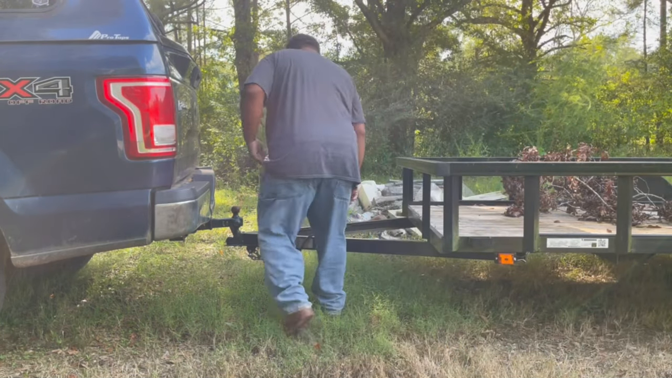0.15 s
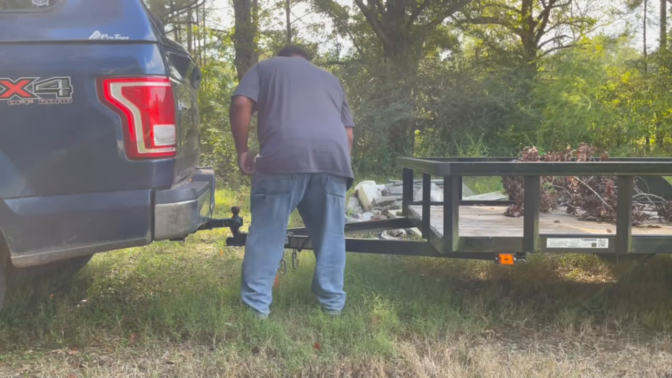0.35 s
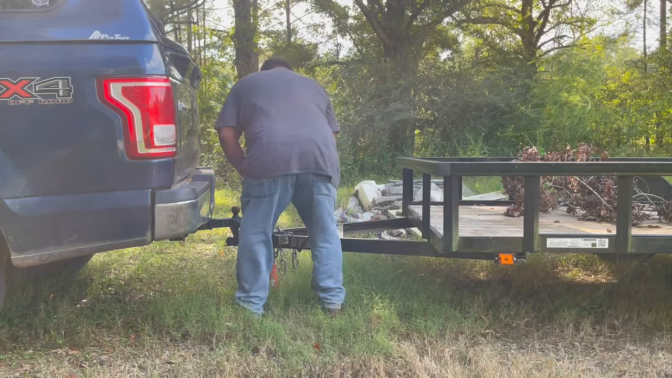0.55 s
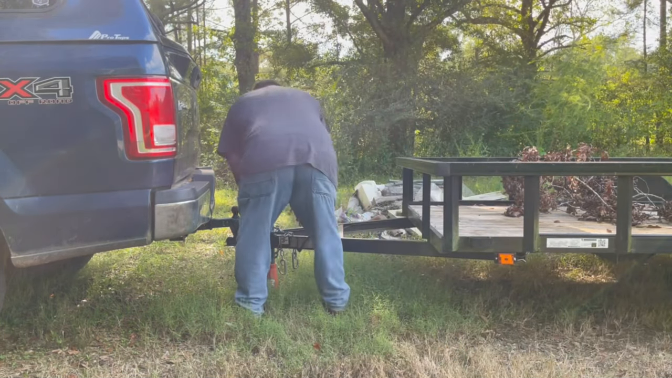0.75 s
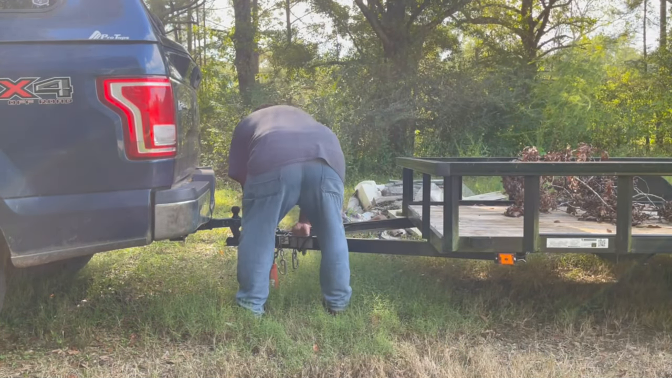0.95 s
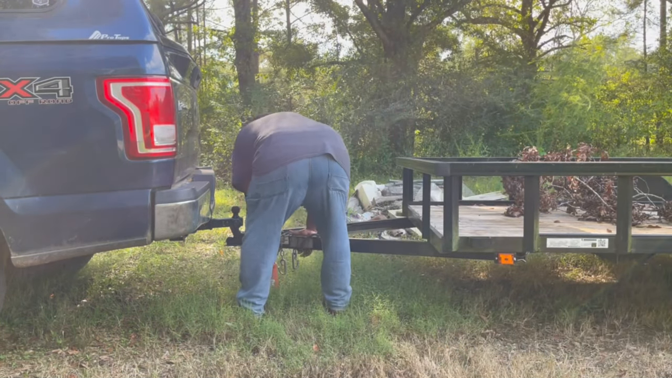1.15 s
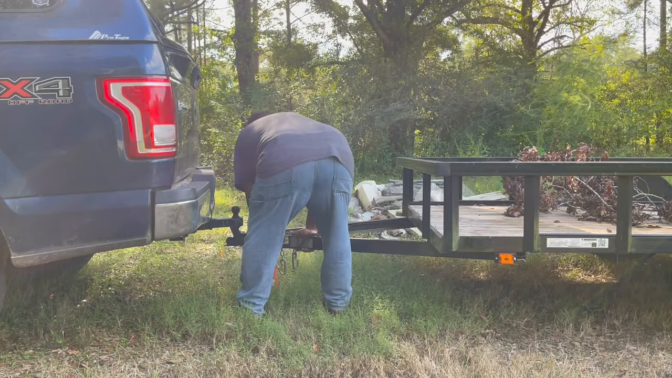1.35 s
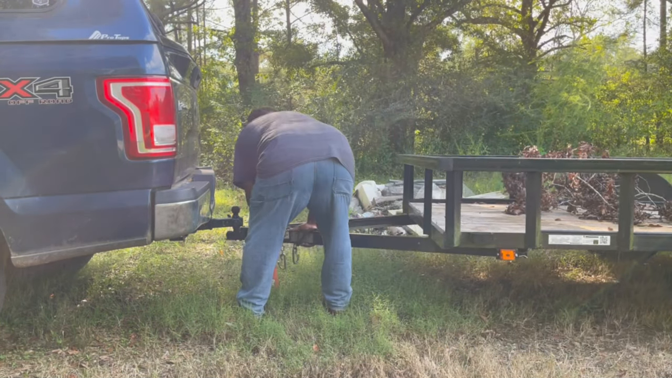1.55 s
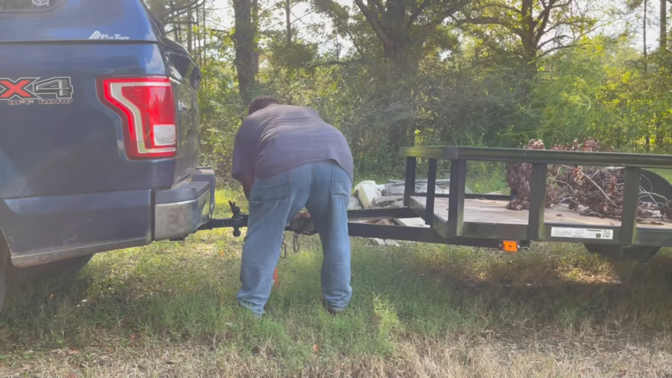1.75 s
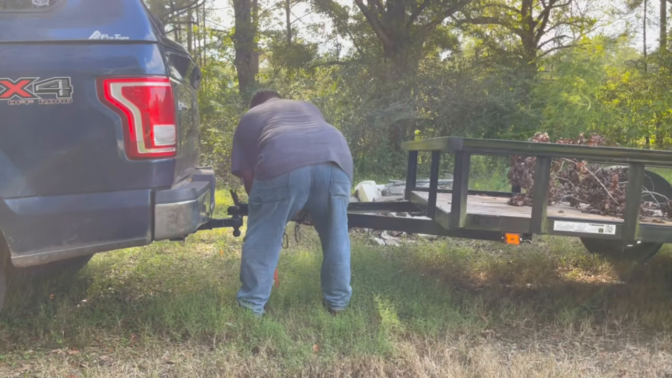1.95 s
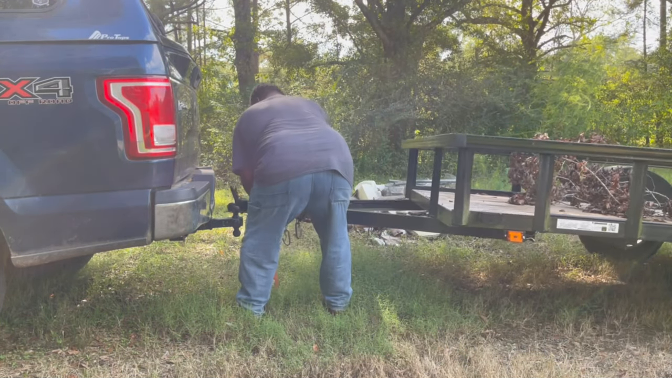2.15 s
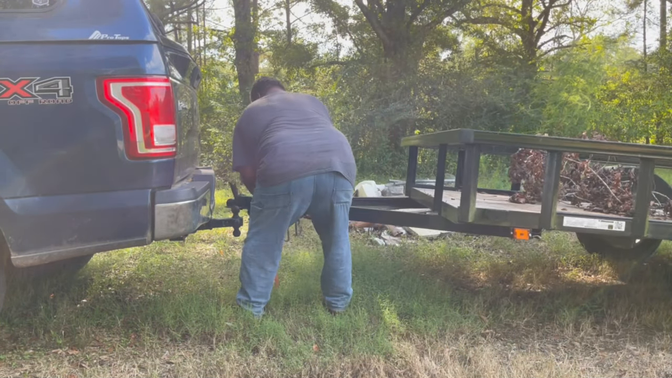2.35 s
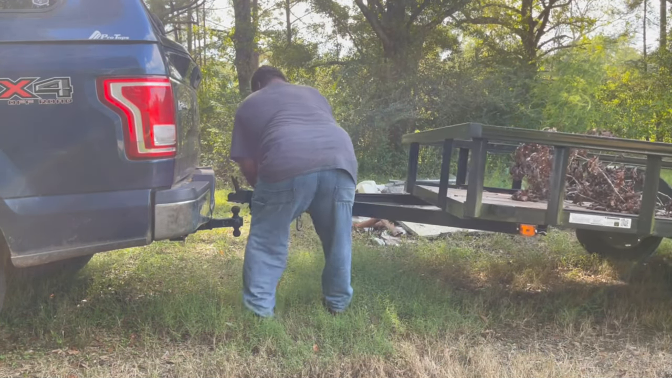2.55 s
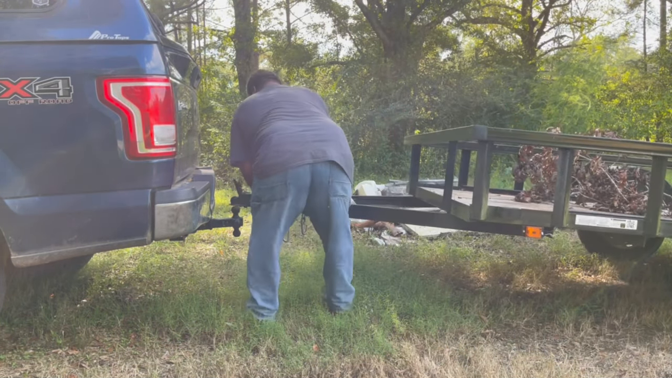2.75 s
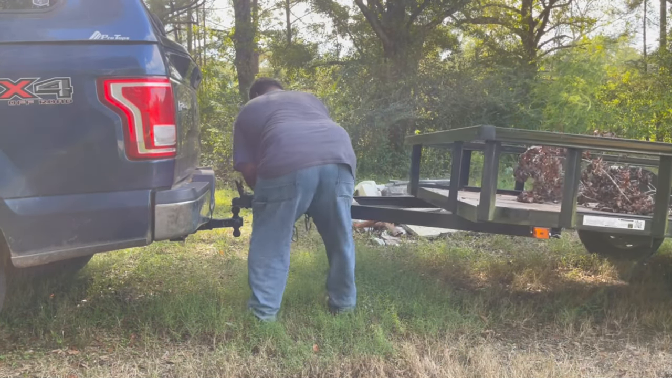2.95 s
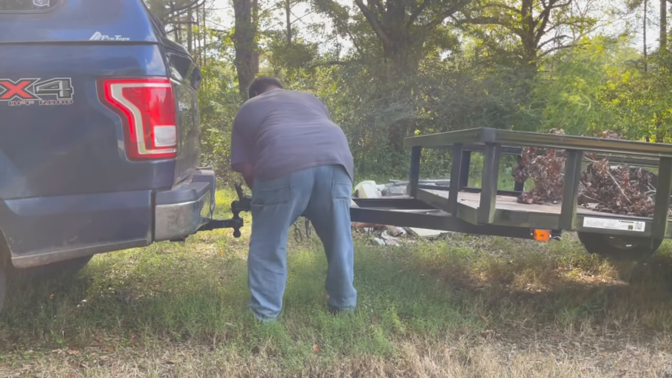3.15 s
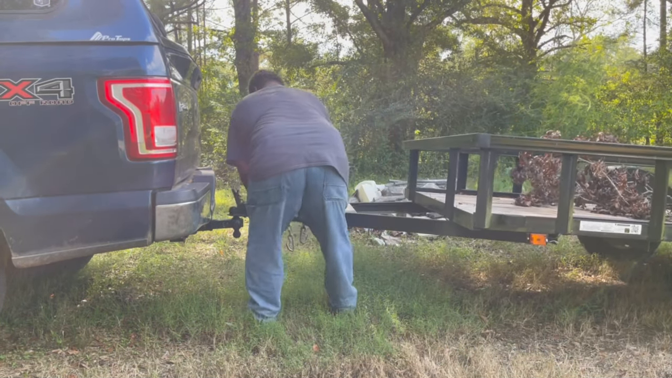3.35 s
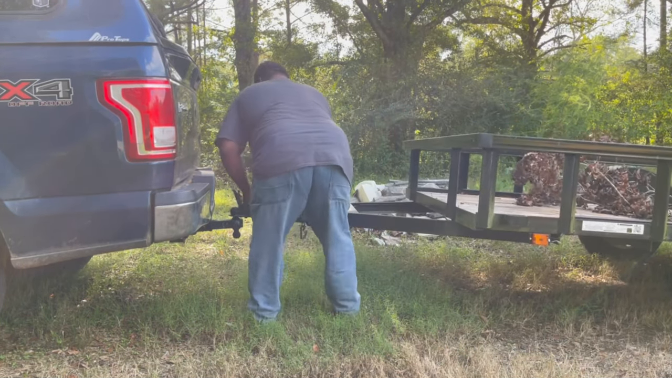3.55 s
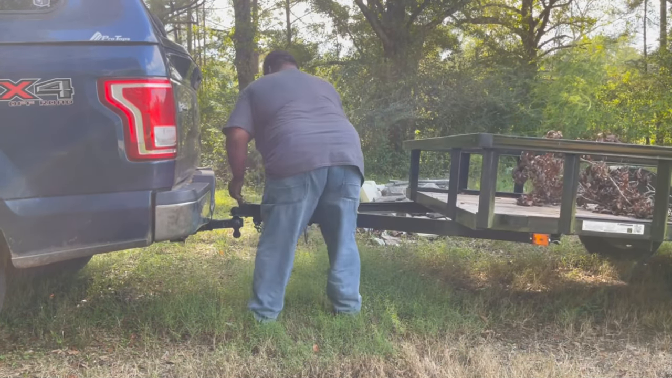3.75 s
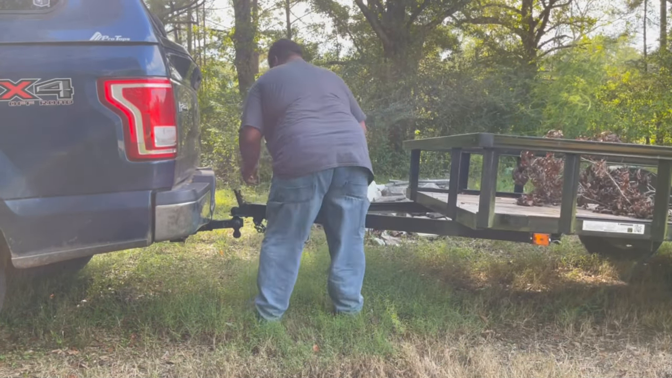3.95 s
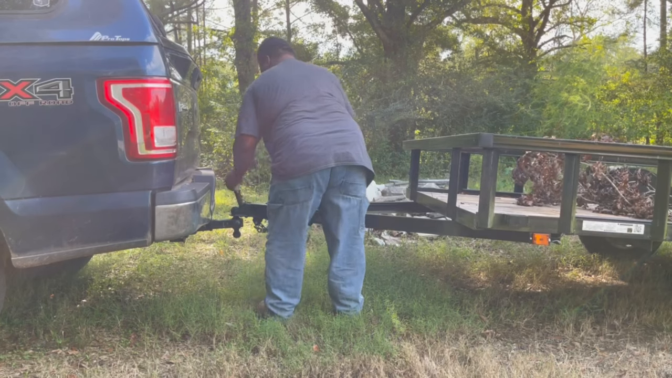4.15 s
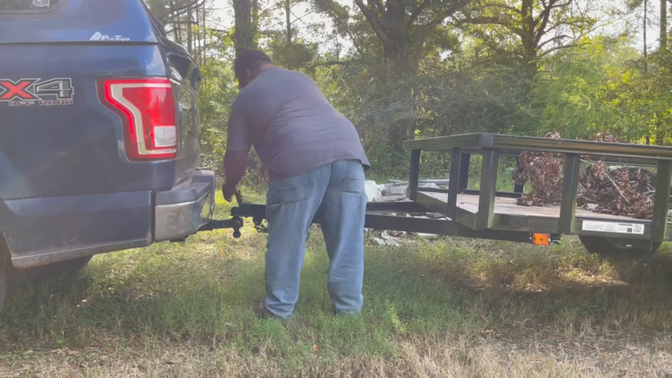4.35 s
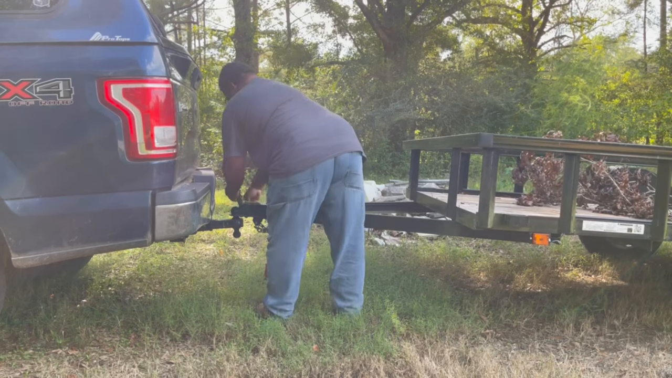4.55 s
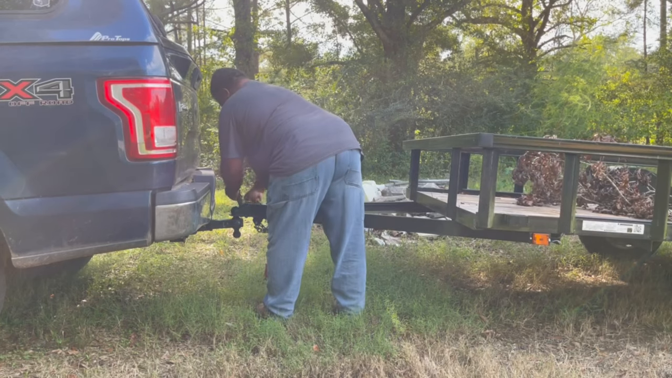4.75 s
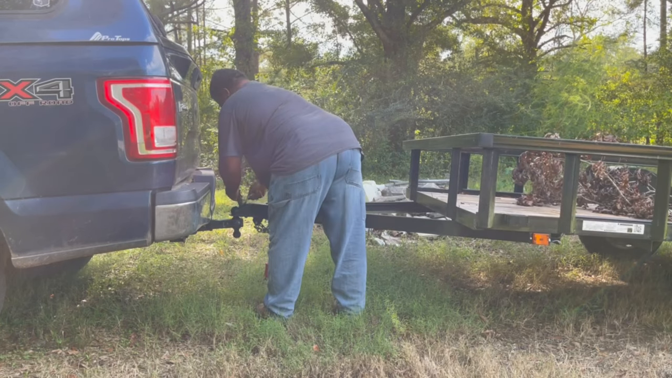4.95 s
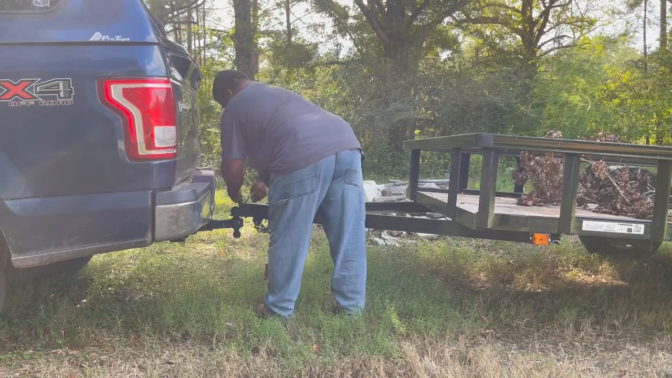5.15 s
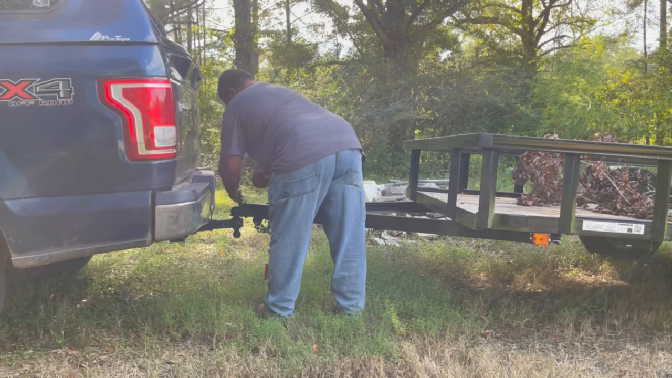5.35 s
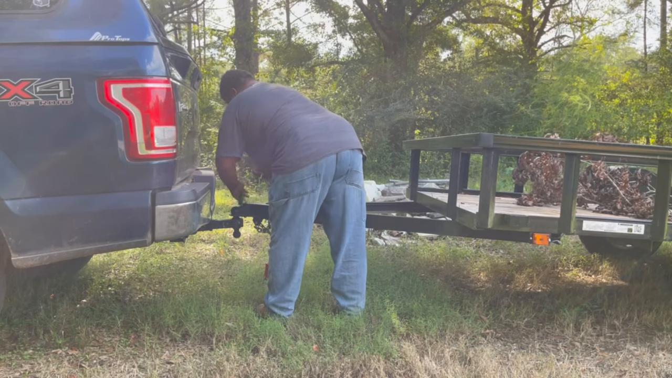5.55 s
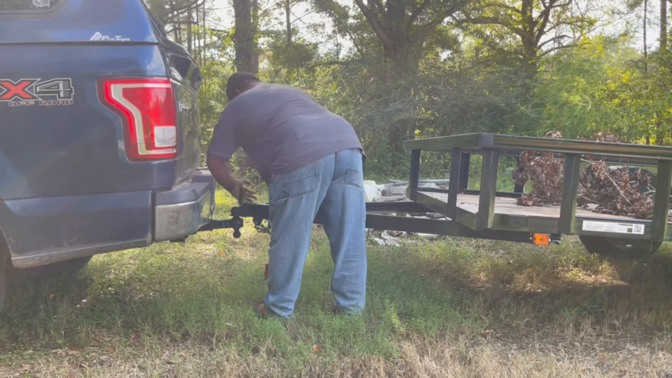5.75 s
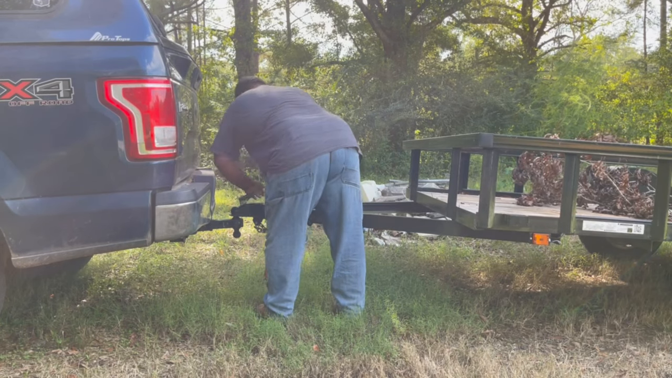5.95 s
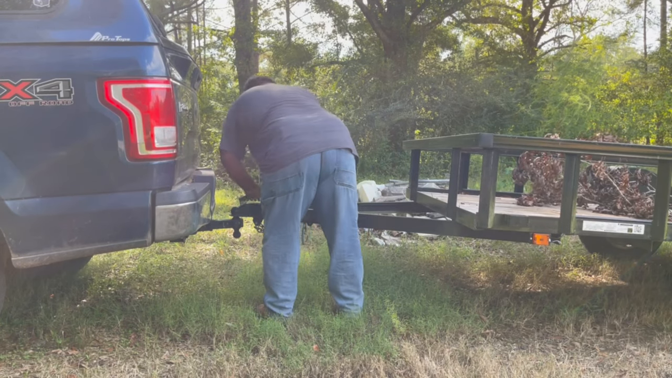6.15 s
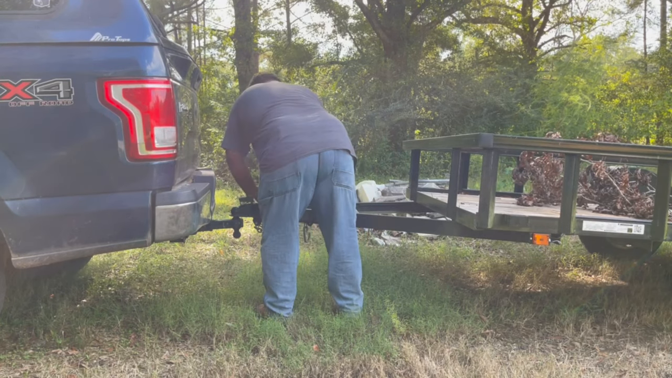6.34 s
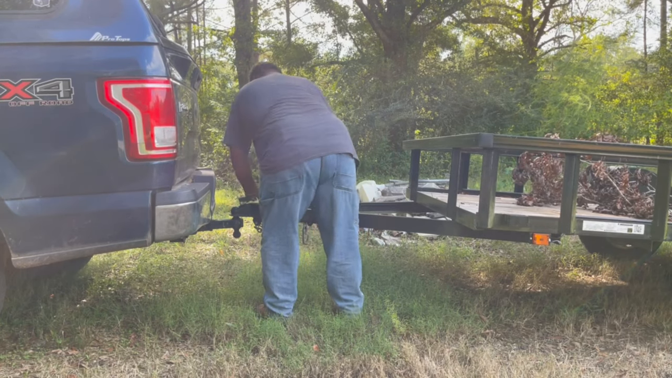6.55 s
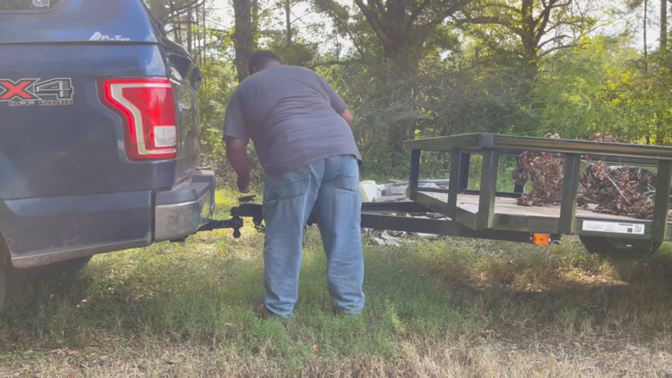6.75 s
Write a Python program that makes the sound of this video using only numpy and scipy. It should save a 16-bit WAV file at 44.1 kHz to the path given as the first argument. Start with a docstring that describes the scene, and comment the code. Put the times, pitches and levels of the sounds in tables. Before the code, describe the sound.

A few metres away in a quiet clearing, legs swish softly through grass and a steel trailer coupler starts to knock and rattle. It lands on the hitch ball in a cluster of loud clanks, with low thuds ringing through the trailer and a safety chain clinking. Lighter clicks follow, then two sharp, pinging latch snaps. Faint traffic, insects and a few bird chips lie behind.

```python
"""A steel trailer coupler is lifted, dropped on a hitch ball and latched, a few metres off in a clearing.
Each blow chatters into the frame, whose bass arrives late; the safety chain clinks, small parts ping,
stalks and latch springs tick. Legs swish through grass, the dry load rustles and a bird chips.
The trees send back a short echo; distant traffic hums and insects hiss in the treble."""
import sys
import numpy as np
from scipy import signal
from scipy.fft import rfft, irfft, next_fast_len
from scipy.io import wavfile
from scipy.ndimage import uniform_filter1d

SR = 44100
rng = np.random.default_rng(int(sys.argv[2]) if len(sys.argv) > 2 else 0)


def unload_audio(sound):
    """Save the sound as a 16-bit wav file, at the path given as the first command line argument."""
    columns = np.transpose(np.atleast_2d(sound))
    # keep every value between -1 and 1, then stretch to whole-number steps
    steps = np.round(np.clip(columns, -1, 1) * 32767)
    wavfile.write(sys.argv[1], SR, steps.astype(np.int16))


N = 303408
T = np.arange(N) / SR
SPAN = SR // 2  # samples per ring-out
FFT_SIZE = next_fast_len(N + SR)
HZ = np.maximum(np.arange(FFT_SIZE // 2 + 1) * SR / FFT_SIZE, 1)
BANDS_HZ = 30 * 2 ** (np.arange(19) / 2)
BASS_TOP_HZ, LINGER_DB = 300, -21

# blows on steel: (time [s], level [dB], bass thud [dB re level], hardness [dB re level], chatter [ms])
BLOWS = [(0.983, -56, -7, -5, 4), (1.0152, -41, -28, -6.5, 2.8), (1.0744, -49.5, -12, -6, 9.7),
         (1.1315, -39.5, -37, -12.5, 8.4), (1.1951, -40.5, -14, 3, 1.6), (1.3726, -42, -26, -4, 0.66),
         (1.468, -48.5, -7, 3.5, 7.7), (1.486, -26, -11, -4, 3.1), (1.804, -53, -7, -28, 3),
         (1.8405, -47, 1, -10, 8.5), (1.8953, -33.5, -19, 1, 1.66), (2.0005, -38.5, -32, -6.5, 3.5),
         (2.1233, -51, 4.5, -16, 13), (2.2305, -40.5, -34, -5, 2.5), (2.7784, -27.5, 8.5, -11.5, 4.5),
         (2.8276, -40, 3.5, -7, 3.4), (2.9235, -35, -8, -8.5, 1.4), (3.023, -15.5, -1.5, -11.5, 2.54),
         (3.138, -20.5, 1.5, -13, 2.6), (3.1737, -23, -1, -12, 6.1), (3.251, -38, 9, -32, 3),
         (3.2865, -30, -0.5, -6.5, 10), (3.3097, -24.5, -4, 1.5, 36), (3.342, -12, 0.5, -5, 2.9),
         (3.4545, -13.5, -7.5, -12.5, 4.5), (3.4743, -21, -4.5, 1, 1.5), (3.4974, -25.5, -1, 1.5, 2.9),
         (3.592, -37, 1.5, -5, 5.3), (3.666, -36.5, -5.5, 1.5, 2.4), (3.684, -36, -6, 0, 2.6),
         (3.7263, -36.5, -2, -7, 7.8), (3.7594, -41.5, 5, -7.5, 9.3), (3.7999, -43, 4, -17, 7.5),
         (4.0608, -46.5, -1.5, -3, 4), (4.4533, -52, -0.5, -4, 4.6), (4.674, -43, -3.5, -8, 4.5),
         (4.7338, -38.5, -13, 1.5, 2.8), (4.841, -49.5, -13, -6, 9), (4.893, -45, -11, 1.5, 2.1),
         (5.058, -54.5, -1, 3, 8), (5.0806, -34.5, -30, -15, 3.2), (5.124, -53.5, -1, 6, 1.4),
         (5.2848, -47, -4, -11, 5), (5.3922, -45.5, -3, -17.5, 2.2), (5.7559, -53, 9, 0, 2.8),
         (5.8491, -41.5, -12, 11.5, 10.6), (5.8701, -26, -13.5, 0.5, 4.3), (5.9234, -40, 6, -7, 1.9),
         (6.039, -47, 2, -5, 2.87), (6.2034, -33, -10, 0, 6.3), (6.2268, -28.5, -8.5, -0.5, 1.6)]
def coupler_blows():
    """Each blow is a burst of uneven little impacts that rings the frame."""
    bands, t = dense_mode_bands(), T[:SPAN]
    out = np.zeros((2, 2, N + SPAN))  # side, twin, sample
    grit = undb(wander(150))
    pan = undb([-.75, .75])[:, None, None]
    draws = rng.standard_normal((len(BLOWS), 4, SPAN))
    offsets = (rng.random(len(BLOWS)) * N).astype(int)
    for (s, db, thud_db, hard_db, chatter_ms), draw, at in zip(BLOWS, draws, offsets):
        rise = (1 - np.exp(-t * 2000 / chatter_ms)) ** 2
        decay = np.exp(-t * 1000 / min(chatter_ms, 30))
        chatter = draw[0] * undb(4.5 * draw[1]) * rise * decay
        chatter /= np.sqrt(np.sum(chatter ** 2))
        mid_db = -8 + .26 * thud_db + .067 * (db + 38.5)
        colour_db = [thud_db, mid_db, 0, hard_db, 1.25 * hard_db - 10]
        t60_scale = 1.035 * (chatter_ms / 4) ** .35
        bass, dense, modes = frame(bands[..., at:at + SPAN], colour_db, t60_scale, draw[2:])
        build_up = np.sqrt(np.cumsum(chatter ** 2))  # energy gathers impact by impact
        upper = dense * build_up * np.roll(grit, at)[:SPAN]
        upper[0] += undb(1) * signal.fftconvolve(modes, chatter[:SPAN // 4])[:SPAN]
        add_at(out, s, undb(db) * (bass + pan * upper))
    left, right = (stereo(*side[:, :N], NEAR) for side in out)
    return np.array([left[0], right[1]])

# steel frame modes: (frequency [Hz], level [dB], base t60 [s])
FRAME_MODES = [(61.76, -11, 0.91), (97.3, -2, .3), (119.8, -1, 0.3), (154.5, -1.5, 0.23),
               (193.3, -6.5, 0.17), (449, -9, 0.32), (615, -13, 0.077), (702, -5.5, 0.11), (865, -5, .15),
               (1127, -7.5, 0.093), (1308, -11.5, .12), (1377, -15, 0.091), (1480, -24, 0.065),
               (1997, -7, 0.097), (2250, -12.5, 0.059), (3080, -13.5, 0.1), (3970, -21, 0.12),
               (4900, -17.5, 0.071)]
def frame(bands, colour_db, t60_scale, spot):
    """The frame's answer to a tap: bass, dense upper modes, distinct upper modes."""
    tint, centre_hz = list(zip(COLOUR_HZ, colour_db)), BANDS_HZ[:, None]
    dense_t60 = t60_scale * over_hz(DENSE_MODES, centre_hz, col=2)
    dense = bands * ring_envelope(centre_hz, dense_t60, tint, LINGER_DB)
    hz, db, t60 = np.transpose(FRAME_MODES)[..., None]
    spot_level, spot_phase = spot[:, :len(hz), None]  # each blow lands on another spot
    low_band, low_mode = BANDS_HZ < BASS_TOP_HZ, hz[:, 0] < BASS_TOP_HZ
    linger_db = np.where(low_mode, LINGER_DB, -29)[:, None]
    modes = undb(db + 2.5 * spot_level) * np.sin(2 * np.pi * hz * T[:SPAN] + 2 * spot_phase)
    modes *= ring_envelope(hz, t60_scale * t60, tint, linger_db)
    bass = dense[:, low_band].sum(axis=1)
    bass[0] += modes[low_mode].sum(axis=0)
    taper = np.cos(np.pi / 2 * T[:SPAN] / T[SPAN])
    return bass * taper, dense[:, ~low_band].sum(axis=1) * taper, modes[~low_mode].sum(axis=0) * taper

# anchors of a blow's tone colour: (frequency [Hz])
COLOUR_HZ = [100, 400, 1600, 4500, 10000]
def ring_envelope(hz, t60, tint, linger_db, linger_stretch=5.03):
    """Bass builds late; after a quick fade, loose panels and chains ring on faintly."""
    t = T[:SPAN]
    rise_s = .03 * (100 / np.maximum(hz, 80)) ** 1.49
    rise = 1 - np.exp(-(t / rise_s) ** 2)
    fade = 1000 ** (-t / t60) + undb(linger_db) * 1000 ** (-t / (t60 * linger_stretch))
    return undb(over_hz(tint, hz)) * rise * fade

# close-packed frame modes: (frequency [Hz], level [dB], base t60 [s])
DENSE_MODES = [(35, -31, 1), (59, -8.5, 0.57), (120, -7.5, 0.4), (307, -9.5, 0.35), (1020, -8.5, 0.19),
               (2700, -12, 0.16), (9200, -8.5, 0.064), (12300, -6.5, 0.22), (12800, -28.5, .05),
               (16000, -35, 0.093)]
def dense_mode_bands(ripple_db=3, ripple_hz=45):
    """Close modes blur into noise: two unrelated sets of half-octave bands with lumpy resonances."""
    noise = rfft(rng.standard_normal((2, 1, FFT_SIZE)))
    lumps = smooth(rng.standard_normal(len(HZ)), int(ripple_hz * FFT_SIZE / SR))
    depth_db = ripple_db * (HZ > BASS_TOP_HZ) / (1 + (HZ / 3000) ** 2)
    gains = undb(depth_db * lumps / lumps.std()) * np.exp(-(2 * np.log2(HZ / BANDS_HZ[:, None])) ** 2)
    gains /= np.sqrt(np.mean(gains ** 2, axis=1, keepdims=True))
    return irfft(noise * gains * undb(over_hz(DENSE_MODES)), FFT_SIZE)

# chain clinks: (time [s], relative level [dB])
CLINKS = [(3.2214, -35.5), (3.2464, -36.5), (3.5932, -25), (3.6666, -35), (3.7269, -30.5), (3.7584, -30.5),
          (3.7988, -38), (3.9015, -45), (3.927, -40), (4.0272, -42), (4.0642, -46), (4.119, -45.5),
          (4.2817, -53), (4.4543, -54)]
# link modes: (frequency [Hz], level [dB], t60 [s])
LINK_MODES = [(1550, -6.5, .04), (1790, -2.5, 0.034), (1870, 1, .05), (2130, 3, 0.061), (2220, -5.5, .045),
              (2520, -6.5, .04), (2900, -9, .035)]
def safety_chain(gain_db=-7, knock_ms=2.5, spread_db=4, detune=.02):
    """Links knock together and ring briefly, a slightly different set each time."""
    out, t = np.zeros((2, N + SPAN)), T[:SPAN // 4]
    hz, db, t60 = np.transpose(LINK_MODES)[..., None]
    draws = rng.standard_normal((len(CLINKS), 2, 2, len(hz), 1))
    knocks = rng.standard_normal((len(CLINKS), len(t))) ** 3 * t * np.exp(-t * 1000 / knock_ms)
    for (s, clink_db), (size, tune), knock in zip(CLINKS, draws, knocks):
        tones = np.sin(2 * np.pi * hz * (1 + detune * tune) * t)
        ring = undb(db + spread_db * size) * tones * 1000 ** (-t / t60)
        clink = signal.fftconvolve(ring.sum(axis=1), knock[None] / np.sqrt(np.sum(knock ** 2)))
        add_at(out, s, undb(clink_db + gain_db) * clink)
    return stereo(*out[:, :N], NEAR)

# pings of pins and latch parts; at 5.522 s, the high overtone of a bird chip:
# (time [s], pitch [Hz], level [dB], t60 [s], left minus right [dB])
PINGS = [(1.195, 5150, -34, 0.023, -8), (1.2, 3120, -47.5, .18, 0), (1.373, 2720, -18, 0.02, 3),
         (1.377, 3050, -20, 0.014, -3), (1.841, 2260, -39, 0.028, -3), (1.842, 3550, -45, 0.033, -4),
         (3.29, 3030, -33, 0.037, 0), (3.594, 3420, -39, 0.096, -2), (3.683, 2980, -27.5, 0.029, -2),
         (5.522, 8400, -44.5, 0.034, 0), (5.856, 4820, -28, 0.045, 7.5), (5.863, 4620, -20.5, 0.081, 10),
         (5.869, 4400, -13.5, 0.038, 3), (5.89, 4480, -51, .5, 6), (5.888, 5300, -39, .045, 3),
         (5.925, 7100, -42, 0.088, 3), (5.925, 8930, -36, .04, 1), (6.043, 645, -35, 0.084, 0),
         (6.047, 900, -43, 0.16, 0), (6.228, 9240, -9, 0.028, 1), (6.25, 9270, -50, 0.48, -2)]
def pings(rise_cycles=7.5, steady_s=.03):
    """Decaying tones of one pitch each, wavering more in level as they fade."""
    out, side, t = np.zeros((2, N)), np.array([[.5], [-.5]]), T[:SPAN]
    drift_db = 6 * wander(130)
    for s, hz, db, t60, pan_db in PINGS:
        lead_rad = 1.27 * (hz / 4500) ** .45
        tone = np.sin(2 * np.pi * hz * t + side * lead_rad)
        envelope = (1 - np.exp(-t * hz / rise_cycles)) * 1000 ** (-t / t60)
        waver_db = drift_db[int(s * SR):][:SPAN] * (1 - np.exp(-t / steady_s))
        add_at(out, s, undb(db + side * pan_db + waver_db) * envelope * tone)
    return out

# dry ticks: (time [s], level [dB], centre [Hz])
TICKS = [(0.154, -37.5, 7700), (0.414, -42, 10000), (1.105, -56, 4000), (1.146, -59, 6000),
         (1.417, -51, 3000), (1.733, -50, 3200), (2.446, -49.5, 4960), (2.481, -54.5, 4530),
         (4.736, -27, 8700), (4.893, -37, 9900), (5.125, -29.5, 9200)]
def ticks(width_octaves=.72, decay_ms=1.24, top_hz=12800):
    """Stalks and latch springs snap: a few milliseconds of noise around one pitch."""
    out, t = np.zeros((2, N)), T[:1024]
    hz = np.maximum(np.fft.rfftfreq(len(t), 1 / SR), 1)
    for s, db, centre_hz in TICKS:
        band = np.exp(-(np.log2(hz / centre_hz) / width_octaves) ** 2) / (1 + (hz / top_hz) ** 10)
        noise = irfft(rfft(rng.standard_normal((2, len(t)))) * band)
        add_at(out, s, at_level(noise, db) * np.exp(-t * 1000 / decay_ms))
    return stereo(*out, NEAR)

def load_shake(gain_db=-36, peak_s=.072):
    """Rustle envelope of the dry load: each thud adds energy that builds and dies away."""
    power = np.zeros(N)
    for s, db, thud_db, *_ in BLOWS:
        age = np.maximum(T - s, 0) / peak_s
        power += undb(2 * (db + thud_db + gain_db)) * age * np.exp(1 - age)
    return np.sqrt(power)

# legs brushing grass: (time [s], length [s], level [dB])
SCUFFS = [(0.16, 0.28, -67), (0.323, 0.18, -62), (0.612, 0.2, -65.5), (1.0, 0.26, -79), (1.973, .08, -74),
          (2.15, 0.12, -75), (2.3, 0.21, -70), (2.49, 0.17, -52.5), (3.972, 0.26, -65), (4.614, .12, -75.5),
          (4.996, 0.15, -67.5), (5.898, 0.06, -72)]
def grass_and_load():
    """Brushed blades and the shaken load give a grainy rustle with a finer hiss on top."""
    grains = rng.standard_normal((2, N)) * undb(2 * rng.exponential(size=(2, N)))
    rustle_db = over_hz([(600, -20), (2000, 3.5), (6000, -3.5), (9000, -6), (10500, -14), (12000, -38.5)])
    hiss_db = over_hz([(6000, -24), (8500, -5.5), (11500, 2.5), (12300, -10),
                       (13000, -36), (16000, -37.5)])
    swish, shake = np.zeros(N), load_shake()
    for s, length_s, db in SCUFFS:
        progress = np.clip((T - s) / length_s, 0, 1)
        swish += undb(db) * np.abs(np.sin(np.pi * progress)) ** 2.2
    rustle = at_level(filtered(grains, undb(rustle_db)), 0) * (swish + shake)
    hiss = at_level(filtered(grains, undb(hiss_db)), 0) * (undb(3.5) * swish + undb(-12) * shake)
    flicker = undb(2.3 * wander(40))
    return stereo(*(rustle + hiss) * flicker, FAR)

# bird chips: (time [s], level [dB])
CHIPS = [(0.258, -53.5), (1.565, -52.5), (4.477, -59), (5.52, -51)]
def bird(length_s=.034):
    """Short whistles that sag, then drop."""
    out, progress = np.zeros(N), T[:int(length_s * SR)] / length_s
    hz = np.interp(progress, [0, .6, 1], [5700, 5190, 3830])
    chip = np.sin(np.pi * progress) * np.sin(2 * np.pi * np.cumsum(hz) / SR)
    for s, db in CHIPS:
        add_at(out, s, undb(db) * chip)
    return out

def tree_echo(x, t60_s=.28, rise_s=.011):
    """Trees scatter a short echo, strongest in the mids."""
    t = T[:SR]
    tail = rng.standard_normal((2, SR)) * 1000 ** (-t / t60_s) * (1 - np.exp(-t / rise_s))
    tail /= np.sqrt(np.sum(tail ** 2) / 2)
    colour_db = over_hz([(100, -1.5), (500, 7), (6000, 5), (12000, 2.5)])
    return filtered(tail, rfft(x, FFT_SIZE) * undb(colour_db))

# distant traffic: (time [s], relative rumble [dB], relative tyre hiss [dB])
TRAFFIC_LEVELS = [(0, -48, -58), (.75, -45.5, -57.5), (1.7, -46, -54.5), (2.5, -45.5, -58),
                  (4.2, -46.5, -58), (4.9, -54, -61), (5.7, -50, -59.5), (6.3, -46.5, -60),
                  (6.88, -45.5, -62)]
# traffic spectrum: (frequency [Hz], relative density [dB])
TRAFFIC_SPECTRUM = [(12, -51.5), (20, -23.5), (65, -1), (149, -2.5), (248, -11), (280, -21), (365, -18),
                    (454, -23.5), (1010, -15.5), (1680, -30.5), (3820, -42.5), (5230, -43.5), (6500, -43),
                    (8450, -117), (14300, -120)]
def traffic(noise, crossover_hz=350):
    """Rumble and tyre hiss swell independently."""
    times, rumble_db, tyre_db = np.transpose(TRAFFIC_LEVELS)
    spectrum = undb(over_hz(TRAFFIC_SPECTRUM))
    low = 1 / (1 + (HZ / crossover_hz) ** 4)
    out = 0
    for band, db, gain_db in [(low, rumble_db, .61), (1 - low, tyre_db, 2.2)]:
        swell = undb(np.interp(T, times, db) + 1.8 * wander(3))
        out += at_level(filtered(noise, band * spectrum), gain_db) * swell
    return out

# insect bands: (centre [Hz], width [Hz], level [dB])
INSECT_BANDS = [(7740, 310, -72), (9520, 450, -71.5), (10890, 180, -71.5), (8150, 1300, -69)]
def insects(noise):
    """Narrow treble bands that throb quickly and drift slowly in level."""
    out = 0
    for hz, width_hz, db in INSECT_BANDS:
        band = np.exp(-((HZ - hz) / width_hz) ** 2)
        throb = undb(1.1 * wander(90) + .7 * wander(1.3))
        out += at_level(filtered(noise, band), db) * throb
    return out

# near and far stereo images, three curves each: (frequency [Hz], left minus right [dB]),
# (frequency [Hz], coherence [0-1]), (frequency [Hz], left lead [rad])
NEAR = ([(60, -3), (300, -2.5), (600, -2), (2000, -0.5), (5000, 5), (10000, 1)], [(150, 1), (350, 0.77),
        (700, 0.51), (1400, 0.48), (2800, 0.32), (8000, 0.88)], [(60, 0.48), (300, 0.28), (700, -0.39),
        (2070, -1.1), (4650, -0.92), (7670, 1), (12000, -0.18)])
FAR = ([(60, -3.5), (300, -3.5), (1000, 1.5), (3000, -0.5), (8000, 1.5)], [(150, 1), (350, 0.32),
       (700, 0.33), (1400, 0.24), (5000, 0.075), (9000, 0.78)], [(300, 0.11), (1100, 1.5), (5000, 2.7),
       (9000, 4.8)])
def stereo(shared, twin, image):
    """Left and right from a shared sound and an unrelated twin."""
    balance_db, coherence, lead_rad = (over_hz(curve) for curve in image)
    side = np.array([[1], [-1]])
    mid = np.sqrt((1 + coherence) / 2) * rfft(shared, FFT_SIZE)
    spread = np.sqrt((1 - coherence) / 2) * rfft(twin, FFT_SIZE)
    placement = undb(side * balance_db / 2) * np.exp(side * .5j * lead_rad)
    return irfft((mid + side * spread) * placement, FFT_SIZE)[:, :N]

def undb(db):
    return 10 ** (np.asarray(db) / 20)

def at_level(x, db):
    return x * undb(db) / np.sqrt(np.mean(x ** 2))

def add_at(out, s, sound):
    out[..., int(s * SR):int(s * SR) + sound.shape[-1]] += sound

def over_hz(table, hz=HZ, col=1):
    """A table column interpolated over log frequency."""
    table = np.array(table, float)
    return np.interp(np.log(hz), np.log(table[:, 0]), table[:, col])

def filtered(x, gain):
    return irfft(rfft(x, FFT_SIZE) * gain, FFT_SIZE)[..., :N]

def smooth(x, width):
    return uniform_filter1d(uniform_filter1d(x, width), width)

def wander(rate_hz):
    """Smoothed random steps, spread near 1."""
    hold = int(SR / rate_hz)
    return 1.3 * smooth(np.repeat(rng.standard_normal(N // hold + 1), hold), hold)[:N]

def scene():
    clatter = coupler_blows() + safety_chain() + pings() + ticks()
    chips = bird()
    echo = undb(-23) * tree_echo(clatter.mean(axis=0)) + undb(-9.5) * tree_echo(chips)
    rustle = grass_and_load()
    noise = rng.standard_normal((2, N))
    background = stereo(*(traffic(noise) + insects(noise)), FAR)
    return clatter + chips + echo + rustle + background

def record(dry):
    """Steep low-pass at 15.8 kHz."""
    return signal.sosfilt(signal.ellip(8, .2, 70, 15800, fs=SR, output="sos"), dry)

dry = scene()
out = record(dry)
unload_audio(out)
```